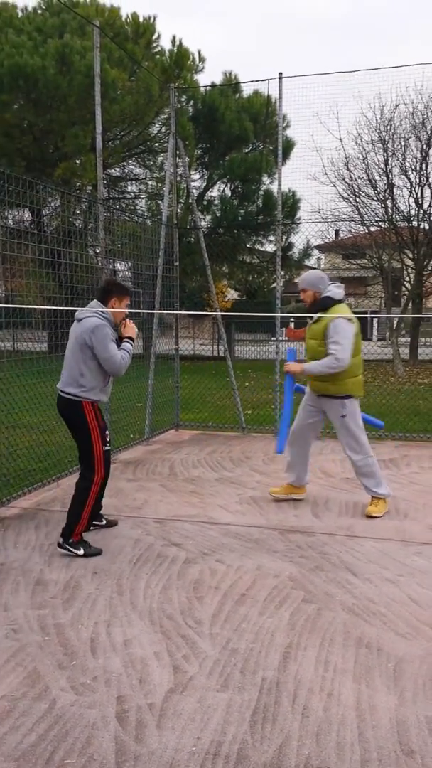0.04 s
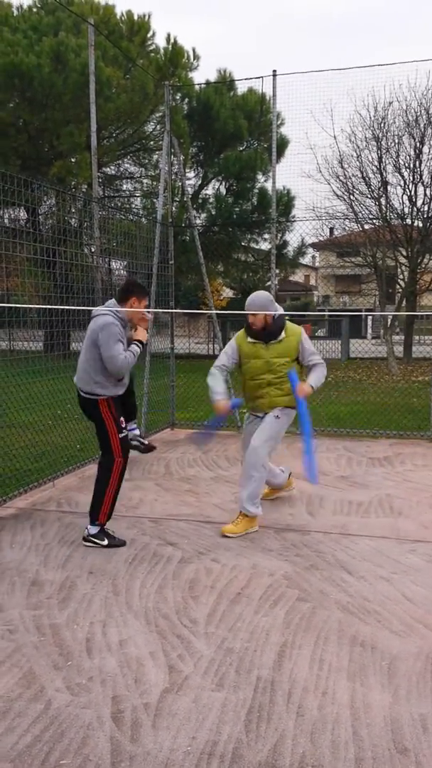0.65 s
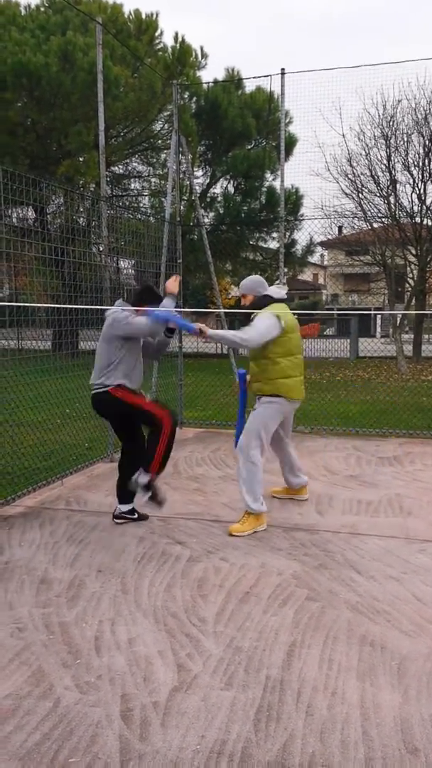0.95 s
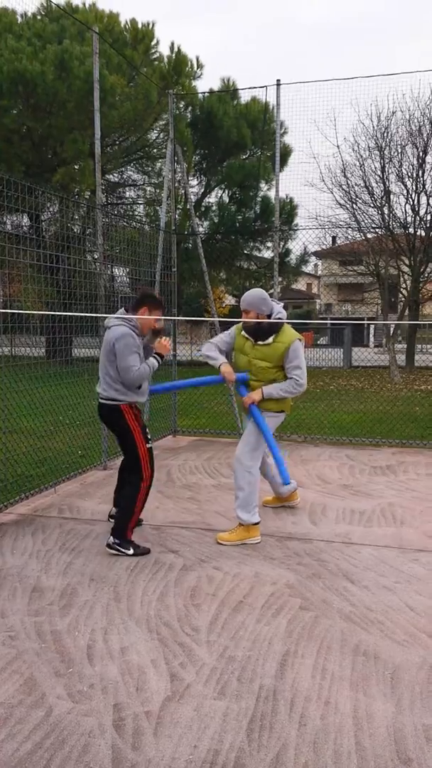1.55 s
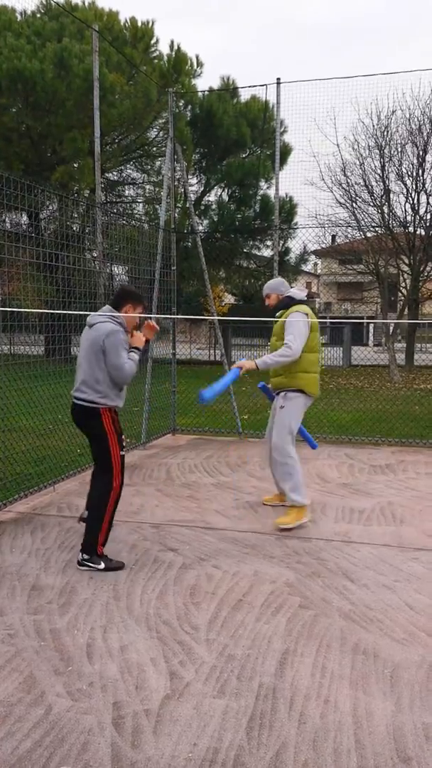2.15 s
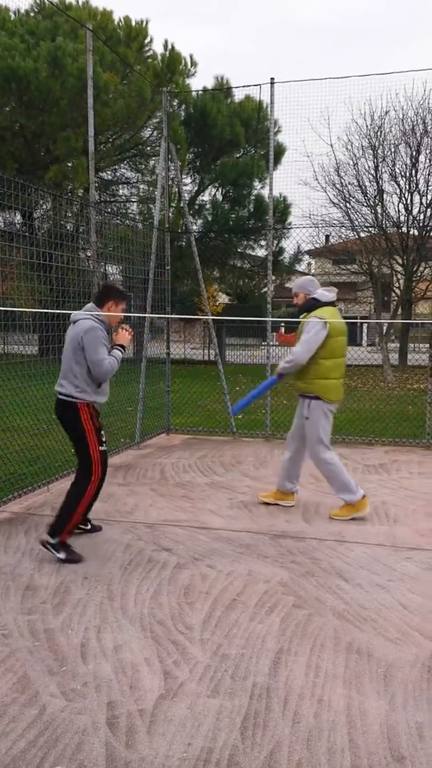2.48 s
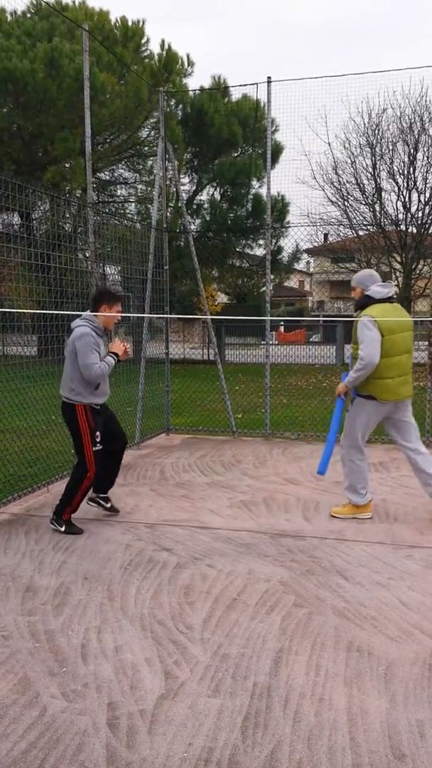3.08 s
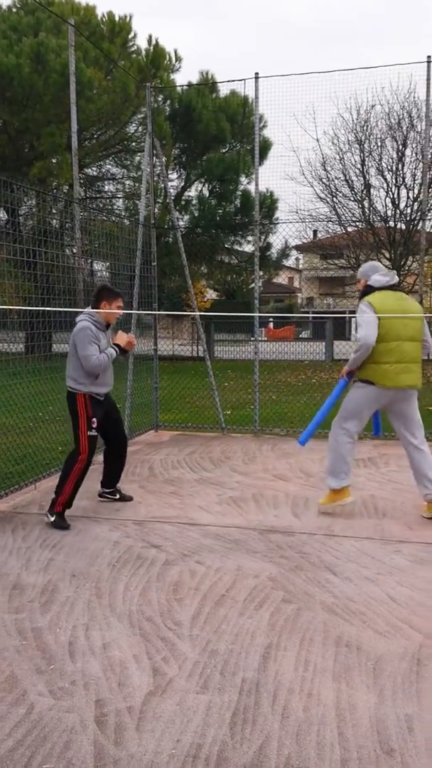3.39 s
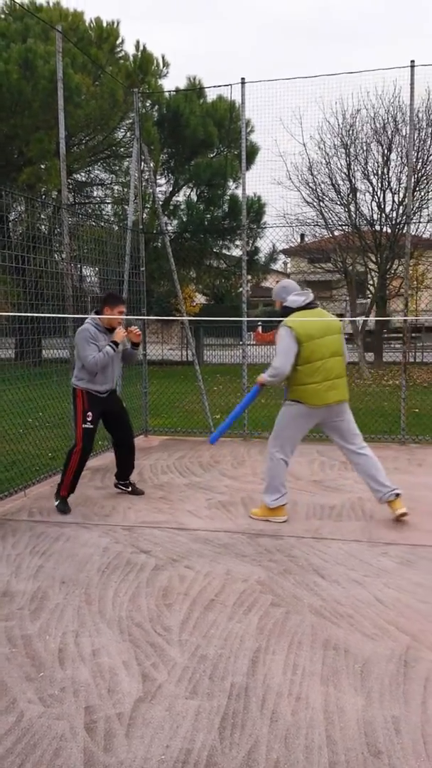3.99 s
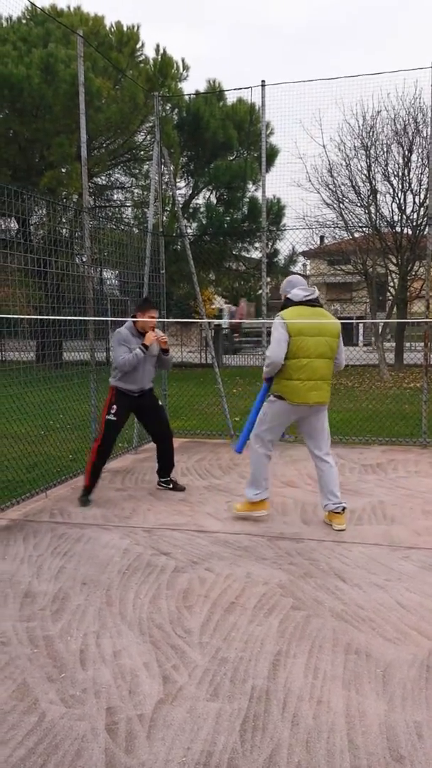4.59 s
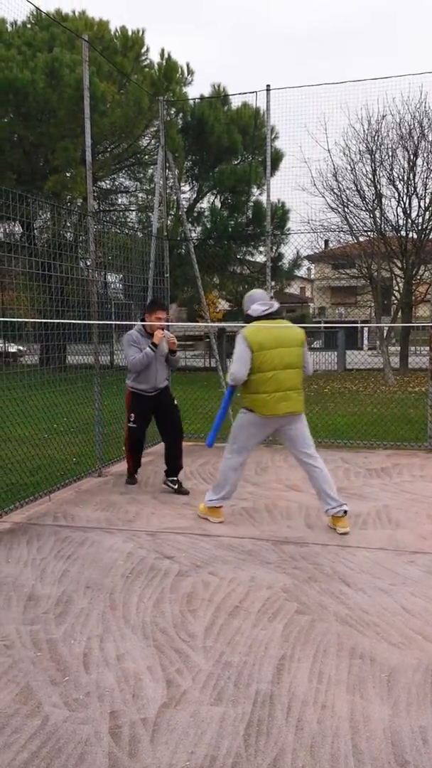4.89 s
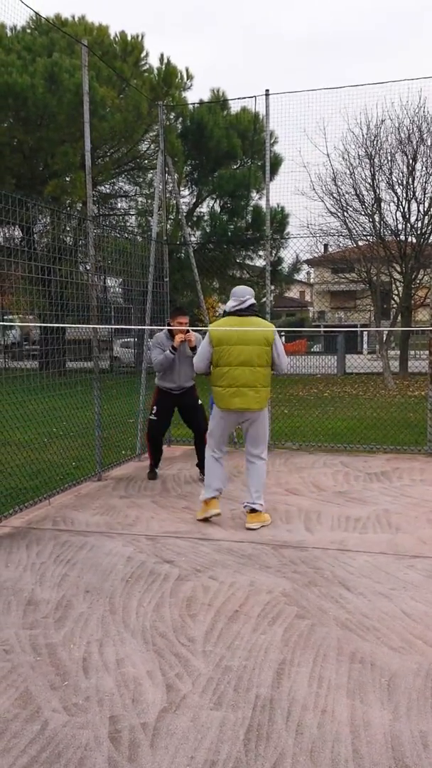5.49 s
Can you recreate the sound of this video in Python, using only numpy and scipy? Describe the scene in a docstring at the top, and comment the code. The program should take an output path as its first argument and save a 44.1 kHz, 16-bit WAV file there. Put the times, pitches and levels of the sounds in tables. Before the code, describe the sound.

Steady road traffic runs behind a sparring session on outdoor paving. Early on, three popping foam stick blows land on a leg and padding, less than half a second apart. Short gritty shoe scrapes and faint clothing rustle carry on as a lorry's low drone swells and passes, joined late by a second humming vehicle and a faint car. The blows sound nearer the microphone than the road, with very little echo.

```python
"""Outdoor paved court, sparring. A foam stick slaps a leg and a padded guard three times;
the paving doubles each blow. Shoes scuff and tick on grit, clothes swish.
Behind the fence a lorry drones past in steady traffic: exhaust boom, engine overtones, rumble, tyres.
Near the end a second vehicle hums and a car rushes by."""
import sys
import numpy as np
from scipy import signal
from scipy.fft import rfft, irfft
from scipy.io import wavfile

SR = 44100
rng = np.random.default_rng(int(sys.argv[2]) if len(sys.argv) > 2 else 0)


def master(y):
    """Save y as 16-bit WAV."""
    cut = np.clip(np.atleast_2d(y).T, -1, 1)
    pcm = np.round(cut * 32767)  # scale
    wavfile.write(sys.argv[1], SR, pcm.astype(np.int16))


N = 253134
TIME_S = np.arange(N) / SR
BINS_HZ = np.maximum(np.arange(N // 2 + 1) * SR / N, 1)

# exhaust boom: (time [s], level before trim [dB])
EXHAUST_BOOM = [(0.0, -32.5), (0.06, -33.5), (0.38, -46), (0.45, -33), (0.7, -32), (0.94, -42.5),
                (1.13, -31.5), (1.6, -35.5), (1.69, -29), (1.98, -31.5), (2.48, -26), (3.13, -32.5),
                (3.77, -31.5), (3.97, -42), (4.17, -31.5), (4.35, -42), (4.54, -33.5), (5.0, -41),
                (5.07, -28.5), (5.4, -44), (5.61, -39), (5.74, -46)]
# each beamed its own way: (multiple of firing rate, peak time [s], peak [dB], approach [s], retreat [s])
ENGINE_OVERTONES = [(1.5, 2, -46.5, 1.6, 1.8), (2, 4.7, -39.5, 2.1, 0.56), (3, 2.5, -38, 1.48, 2.2),
                    (3.5, 4.8, -40, 2.2, 1.3), (4, 2.9, -38, 1.3, 2.8), (5, 1.36, -42.5, 5.7, 2.7),
                    (5.5, 5.7, -50.5, 2.7, 1.2), (6, 3.1, -53, 2.5, 0.75)]
# noise spectra: (frequency [Hz], relative density [dB])
RUMBLE_SPECTRUM = [(20, -51), (45, -4.5), (80, -2), (120, 3), (170, 0.5), (250, 4), (320, 3), (400, -4),
                   (500, -9), (620, -22), (900, -91)]
ROAR_SPECTRUM = [(350, 1.5), (540, -2.5), (630, -1.5), (760, -3.5), (900, -1), (1200, 2), (1700, -1),
                 (2300, -1.5), (2750, -2), (3200, -10.5), (4500, -63)]
HISS_SPECTRUM = [(2200, 0), (3200, 2.5), (4000, 1.5), (5000, 3), (6000, 5), (6800, 3), (7600, -3.5),
                 (8600, -9.5), (10000, -18.5), (12000, -33.5), (15000, -72)]
TREAD_SPECTRUM = [(1300, -44), (1900, -5), (2300, 1), (2800, 4.5), (3200, -12), (4000, -56)]
CAR_SPECTRUM = [(350, -45), (550, -4.5), (780, 3), (1100, -1), (1600, 2), (2400, -61)]
CLOTH_SPECTRUM = [(2000, -14), (3200, 3), (4500, -2), (6000, 3), (6800, 5.5), (7600, 1), (8600, -8),
                  (10000, -13.5), (12000, -29), (15000, -50)]
# tyre noise reflection: (frequency [Hz], share [0-1])
TYRE_REFLECTION = [(700, .01), (1200, .2), (1600, .3), (2800, .28), (6000, .03)]
# (time [s], level [dB], rise [s], decay [s], grit centre [Hz], band edge [ratio], crackle [dB])
SHOE_SCUFFS = [(0.159, -30, .0004, .002, 7000, 1.4, -45), (0.235, -48, .0006, .005, 9000, 1.3, -54),
               (0.9195, -19.5, .0004, .002, 1700, 4, -44), (0.955, -34, .0004, .002, 5800, 1.3, -60),
               (1.598, -36, .003, .012, 6000, 1.25, -54), (1.919, -27.5, .0015, .012, 950, 1.25, -85),
               (2.558, -25.5, .03, .022, 6100, 1.27, -45), (2.846, -28, .02, .016, 7200, 1.4, -45),
               (2.863, -24.5, .001, .008, 5900, 1.2, -58), (3.517, -24, .007, .022, 2250, 1.2, -72),
               (3.521, -28.5, .003, .016, 5250, 1.14, -75), (3.618, -39, .002, .015, 6800, 1.25, -56),
               (4.005, -33, .0004, .003, 6800, 1.25, -45), (4.888, -40, .002, .015, 7000, 1.3, -64),
               (5.555, -38, .012, .016, 7200, 1.35, -45)]
# (peak time [s], level [dB], half-width [s])
CLOTH_SWISHES = [(0.45, -43.5, 0.25), (1.0, -47, .06), (1.35, -43.5, 0.081), (1.65, -41.5, 0.11),
                 (2.45, -43, 0.4), (3.35, -43, 0.42), (3.93, -41, 0.16), (4.85, -44, 0.14),
                 (5.4, -46, 0.079)]
# (time [s], paving echo [s], echo share [0-1], thud [Hz], thud [dB], thud swell [cycles],
#  pop [Hz], pop [dB], pop swell [cycles], knock [Hz], knock [dB], smack [Hz], smack [dB],
#  foam swell [cycles], crack [dB], bite [dB], rub [dB])
STICK_BLOWS = [(0.6591, .0017, .42, 104, -18.5, 0.68, 269, -4, 0.8, 1015, -10, 2250, -9, 0.74, -12.5, -14, -46),
               (1.0254, .0025, 0.74, 305, -7, 0.54, 748, -12, 0.92, 1090, -14, 2660, -12.5, 0.64, -14, -16, -44.5),
               (1.463, 0.002204, 0.55, 155, -13.5, 0.51, 360, -4.5, 0.27, 940, -24.5, 2123, -16.5, 1.8, -15, -17.5, -42)]
# second vehicle: (multiple of fundamental, relative level [dB], roughness [0-1])
HUM_HARMONICS = [(1, 0.5, 0.65), (2, -12, 1), (3, -14.5, 0.91)]
# between the two microphone ports: (frequency [Hz], coherence [0-1])
PORT_COHERENCE = [(100, 1), (280, .997), (380, .97), (470, .84), (650, .56), (900, .8), (1550, .77),
                  (1850, .37), (2200, .78), (2800, .87), (4200, .1), (6000, .42), (8500, .12)]
# (frequency [Hz], left lead [rad])
PORT_LEAD = [(100, 0), (330, 0), (600, -.8), (860, -.3), (1640, -1.0), (2070, -.5), (2600, -2.3),
             (3270, -3.4), (4400, -5.5), (5860, -10.2), (6720, -11.1), (8400, -17)]
# (frequency [Hz], left minus right [dB])
PORT_COLOUR = [(160, 0), (290, 1.4), (450, 6), (620, -1.5), (780, -5), (1650, 1.8), (1950, 0), (2350, 6.3),
               (3400, 0), (4500, 0), (5600, 2.5), (6700, -11.5), (8500, -9), (11000, -16)]

# pass-bys: (peak time [s], peak [dB], approach [s], retreat [s])
RUMBLE_PASS, DRONE_PASS = (4, -32, 2.5, 1.3), (5, -32, 2.5, 0.6)
ROAR_PASS, HISS_PASS, TREAD_PASS = (2.5, -35.5, 3, 3), (3.5, -39, 3, 3), (2, -41, 0.5, 1.85)
HUM_PASS, CAR_PASS = (4.5, -38, 0.57, .5), (5.5, -43.5, 0.64, 2.5)


def from_db(db):
    """Decibels to gain."""
    return 10 ** (np.asarray(db) / 20)


def unit_rms(x):
    """Scale to rms 1."""
    return x / np.sqrt(np.mean(x ** 2) + 1e-20)


def over_bins(table):
    """Table value per FFT bin, joined on a log axis."""
    hz, value = np.transpose(table)
    return np.interp(np.log(BINS_HZ), np.log(hz), value)


def band(x, low_hz, high_hz, order=2):
    """Causal band-pass."""
    edges_hz = [max(low_hz, 10), min(high_hz, .45 * SR)]
    return signal.sosfilt(signal.butter(order, edges_hz, "band", fs=SR, output="sos"), x + 1e-18)


def delayed(x, delay_s):
    """Fractional delay per channel."""
    return np.array([np.interp(TIME_S - delay_s, TIME_S, side, left=0) for side in x])


def drift(rate_hz):
    """Smooth random wander, rms 1."""
    hop = 40
    pole = np.exp(-2 * np.pi * hop * rate_hz / SR)
    noise = rng.standard_normal(N // hop + 2002)
    slow = signal.lfilter([1], [1, -2 * pole, pole * pole], noise)[2000:]
    return np.interp(np.arange(N) / hop, np.arange(len(slow)), unit_rms(slow))


def swell(stage):
    """Rises to 1 at stage 1, then decays."""
    stage = np.minimum(stage, 40)
    return stage * np.exp(1 - stage)


def ring(age_s, hz, swell_cycles):
    """Softly struck mode."""
    return np.sin(2 * np.pi * hz * age_s) * swell(age_s * hz / swell_cycles)


def rasp(envelope, hz, edge_ratio):
    """Band-noise burst with the energy of its envelope."""
    noise = band(rng.standard_normal((2, N)), hz / edge_ratio, hz * edge_ratio)
    return unit_rms(envelope * noise) * np.sqrt(np.mean(envelope ** 2))


def tone(hz, rough, flutter_hz):
    """Gliding tone, part steady, part fluttering; rms 1."""
    phase = 2 * np.pi * (np.cumsum(hz) / SR + rng.random())
    flutter = drift(flutter_hz) * np.sin(phase) + drift(flutter_hz) * np.cos(phase)
    return np.sqrt(2 * (1 - rough ** 2)) * np.sin(phase) + rough * flutter


def port_noise(spectrum):
    """Shaped noise, partly coherent between the ports; rms 1."""
    left, other = rfft(rng.standard_normal((2, N)))
    coherence = over_bins(PORT_COHERENCE)
    right = coherence * left * np.exp(-1j * over_bins(PORT_LEAD)) + np.sqrt(1 - coherence ** 2) * other
    return unit_rms(irfft(np.array([left, right]) * from_db(over_bins(spectrum)), N))


def pass_gain(peak_s, peak_db, approach_s, retreat_s):
    """Inverse-square pass-by: half power approach_s before the peak and retreat_s after."""
    away = (TIME_S - peak_s) / np.where(TIME_S < peak_s, approach_s, retreat_s)
    return from_db(peak_db) / np.sqrt(1 + away ** 2)


def firing_rate_hz(top_hz=70.06, top_s=2.85, sag_hz_per_s2=.35):
    """The lorry's engine gathers pace, tops out, eases off."""
    return top_hz - sag_hz_per_s2 * (TIME_S - top_s) ** 2


def lorry_engine(firing_hz, boom_trim_db=1, drone_ratio=3.92, octave_db=-20):
    """Exhaust boom, overtones and a rough drone, all tied to the firing rate."""
    boom_db = np.interp(TIME_S, *np.transpose(EXHAUST_BOOM)) + boom_trim_db
    out = from_db(boom_db) * tone(firing_hz, rough=0.16, flutter_hz=15)
    for multiple, *pass_by in ENGINE_OVERTONES:
        out += pass_gain(*pass_by) * tone(multiple * firing_hz, rough=0.3, flutter_hz=2.6)
    drone_hz = drone_ratio * firing_hz
    drone = tone(drone_hz, rough=.5, flutter_hz=7)
    drone += from_db(octave_db) * tone(2 * drone_hz, rough=.5, flutter_hz=3)
    return out + pass_gain(*DRONE_PASS) * drone


def lorry_rumble(firing_hz, depth=0.24):
    """Low noise throbbing with the engine."""
    throb = 1 + depth * np.sin(2 * np.pi * np.cumsum(firing_hz) / SR)
    return pass_gain(*RUMBLE_PASS) * throb * port_noise(RUMBLE_SPECTRUM)


def tyres(waver_db=.3, waver_hz=7, echo_s=0.000713, echo_growth_s_per_s=.000092):
    """Tyre noise, combed by a reflection that lags more as the lorry moves along."""
    direct = np.zeros((2, N))
    for pass_by, spectrum in (ROAR_PASS, ROAR_SPECTRUM), (HISS_PASS, HISS_SPECTRUM):
        waver = from_db(waver_db * drift(waver_hz))
        direct += pass_gain(*pass_by) * waver * port_noise(spectrum)
    direct += pass_gain(*TREAD_PASS) * port_noise(TREAD_SPECTRUM)
    direct += pass_gain(*CAR_PASS) * port_noise(CAR_SPECTRUM)
    reflected = irfft(rfft(direct) * over_bins(TYRE_REFLECTION), N)
    return direct - delayed(reflected, echo_s + echo_growth_s_per_s * TIME_S)


def shoes(grain_db=2.0, crackle_hz=(9000, 15000)):
    """Soles drag grit: a quick, uneven scrape with fine crackle on top."""
    out = np.zeros((2, N))
    grit = unit_rms(rng.standard_normal((2, N)) * from_db(grain_db * drift(400)))
    crackle = unit_rms(band(grit, *crackle_hz))
    for start_s, level_db, rise_s, decay_s, hz, edge_ratio, crackle_db in SHOE_SCUFFS:
        age_s = np.clip(TIME_S - start_s, 0, 30 * decay_s)
        stroke = (1 - np.exp(-age_s / rise_s)) * np.exp(-age_s / decay_s)
        scrape = unit_rms(band(grit, hz / edge_ratio, hz * edge_ratio, order=3))
        out += stroke * (from_db(level_db) * scrape + from_db(crackle_db) * crackle)
    return out


def clothes():
    """Jackets and trousers rub; each move swells and fades."""
    power = sum(from_db(level_db) ** 2 * np.exp(-((TIME_S - peak_s) / half_width_s) ** 2)
                for peak_s, level_db, half_width_s in CLOTH_SWISHES)
    return np.sqrt(power) * port_noise(CLOTH_SPECTRUM)


def stick_blows(contact_s=0.00049, crack_hz=2620):
    """Limb thuds, trapped air pops, foam knocks and smacks, its skin cracks; the paving echoes these."""
    out = np.zeros((2, N))
    for (start_s, echo_s, echo_share, thud_hz, thud_db, thud_cycles, pop_hz, pop_db, pop_cycles,
         knock_hz, knock_db, smack_hz, smack_db, foam_cycles, crack_db, bite_db, rub_db) in STICK_BLOWS:
        age_s = np.maximum(TIME_S - start_s, 0)
        thud = from_db(thud_db) * ring(age_s, thud_hz, thud_cycles)
        pop = from_db(pop_db) * ring(age_s, pop_hz, pop_cycles)
        knock = from_db(knock_db) * ring(age_s, knock_hz, foam_cycles)
        smack = from_db(smack_db) * ring(age_s, smack_hz, 1.31 * foam_cycles)
        crack = from_db(crack_db) * rasp(swell(age_s / contact_s), crack_hz, edge_ratio=1.47)
        direct = crack - band(thud + pop + knock + smack, .8 * thud_hz, 7500)
        out += direct + echo_share * delayed(direct, echo_s)
        out += from_db(bite_db) * tip_bite(age_s) + from_db(rub_db) * stick_rub(age_s)
    return out


def tip_bite(age_s, lag_s=0.00226, whip_s=0.0007, cling_db=-18, cling_s=0.0066):
    """The stick wraps on; its tip bites late and clings."""
    tip_age_s = np.maximum(age_s - lag_s, 0)
    wrap = swell(tip_age_s / whip_s) + from_db(cling_db) * swell(tip_age_s / cling_s)
    return rasp(wrap, hz=6100, edge_ratio=1.167)


def stick_rub(age_s, rise_s=.009, grain_db=2.5):
    """The stick rubs off the cloth: thin, grainy hiss."""
    return rasp(swell(age_s / rise_s) * from_db(grain_db * drift(300)), hz=8400, edge_ratio=1.35)


def court_scatter(x, level_db, t60_s, gap_s=.004):
    """Fence, bodies and trees scatter a thin, short tail."""
    age_s = TIME_S[:SR // 3]
    impulse = rng.standard_normal((2, len(age_s))) * from_db(-60 * age_s / t60_s) * (age_s > gap_s)
    impulse /= np.sqrt(np.sum(impulse ** 2, axis=1, keepdims=True))
    return from_db(level_db) * band(signal.fftconvolve(x, impulse, axes=1)[:, :N], 450, 12000)


def vehicle_hum(start_hz=187.6, sag_hz_per_s=1.15):
    """A second vehicle hums, sinking in pitch as it passes."""
    hum_hz = start_hz - sag_hz_per_s * TIME_S
    hum = sum(from_db(level_db) * tone(multiple * hum_hz, rough, flutter_hz=4.5 * multiple)
              for multiple, level_db, rough in HUM_HARMONICS)
    return pass_gain(*HUM_PASS) * hum


def scene():
    """Sparring in front, road behind."""
    blows = stick_blows()
    early = court_scatter(blows, level_db=-8.5, t60_s=0.017)
    tail = court_scatter(blows, level_db=-18.5, t60_s=0.53)
    sparring = blows + early + tail + shoes()
    firing_hz = firing_rate_hz()
    road = lorry_rumble(firing_hz) + tyres() + lorry_engine(firing_hz) + vehicle_hum()
    return sparring + road + clothes()


def record(dry, low_cut_hz=36, ceiling=.92, high_cut_hz=15000):
    """Port colour, low cut, soft clip, high cut."""
    coloured = irfft(rfft(dry) * from_db(over_bins(PORT_COLOUR) * [[.5], [-.5]]), N)
    coloured = signal.sosfilt(signal.butter(2, low_cut_hz, "high", fs=SR, output="sos"), coloured)
    clipped = coloured / (1 + (coloured / ceiling) ** 6) ** (1 / 6)
    return signal.sosfilt(signal.ellip(10, .1, 80, high_cut_hz, fs=SR, output="sos"), clipped)


dry = scene()
out = record(dry)
master(out)
```